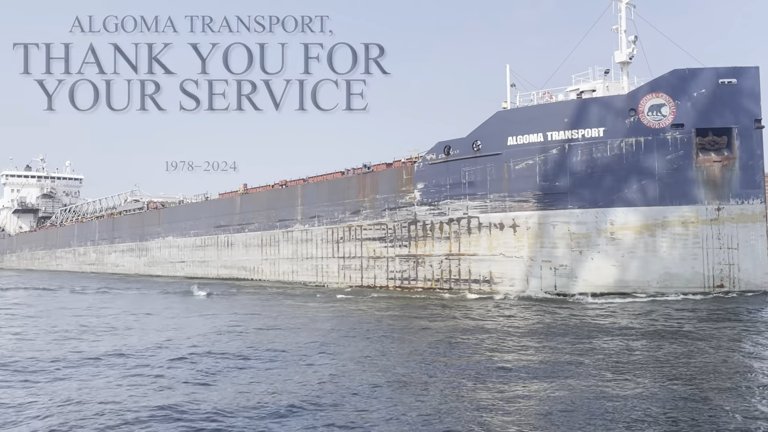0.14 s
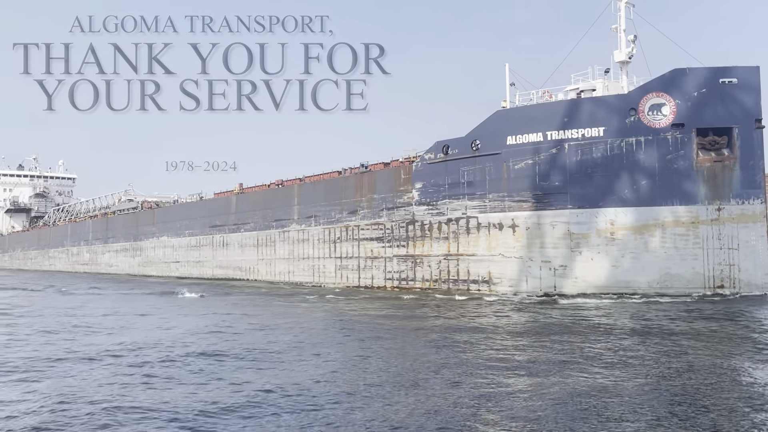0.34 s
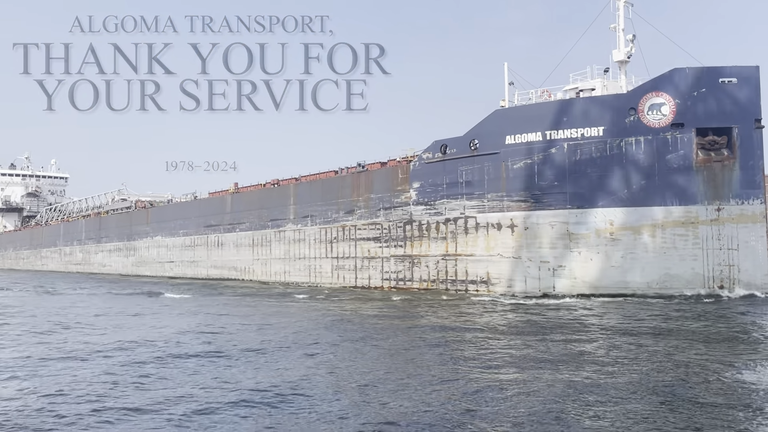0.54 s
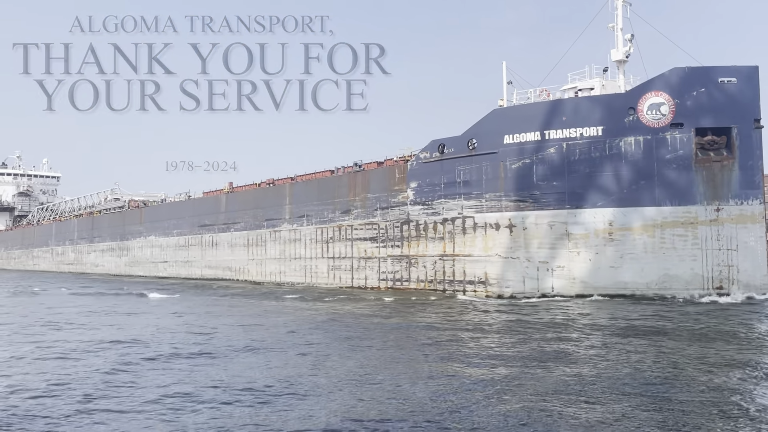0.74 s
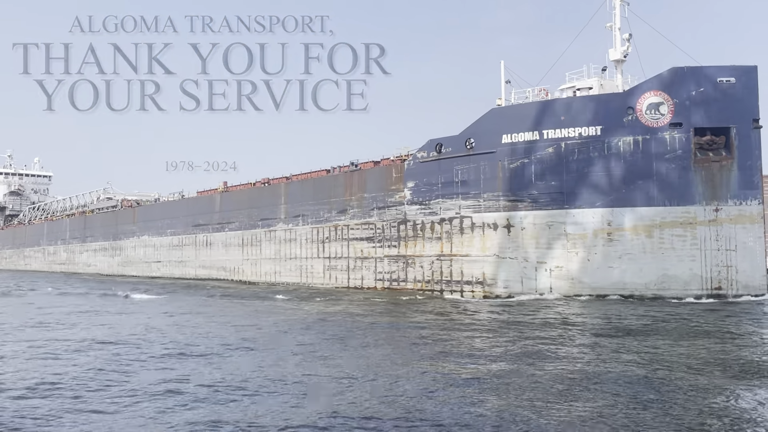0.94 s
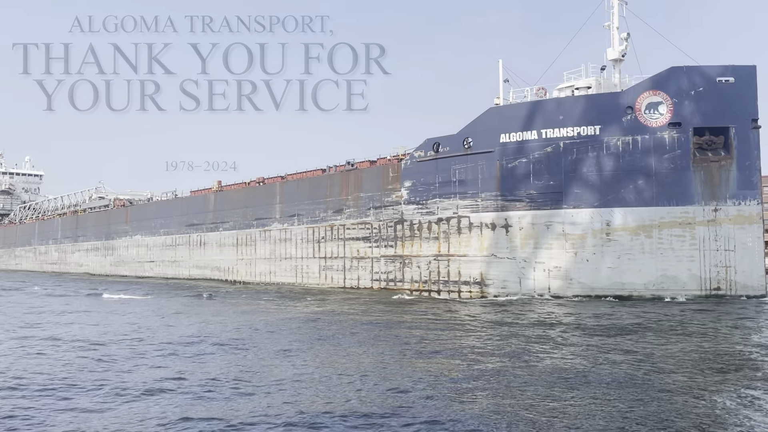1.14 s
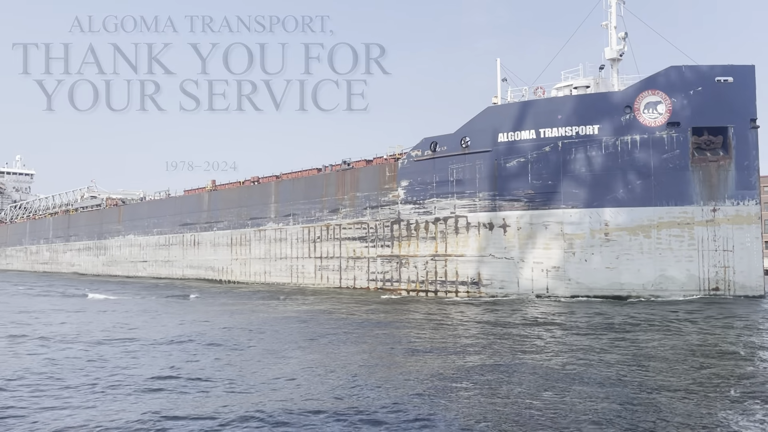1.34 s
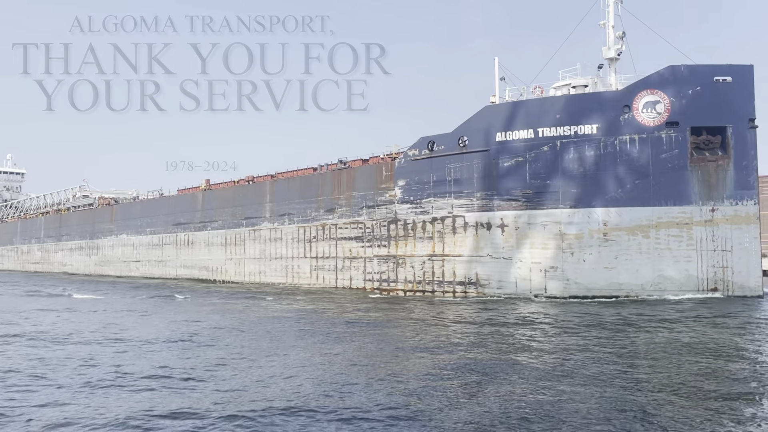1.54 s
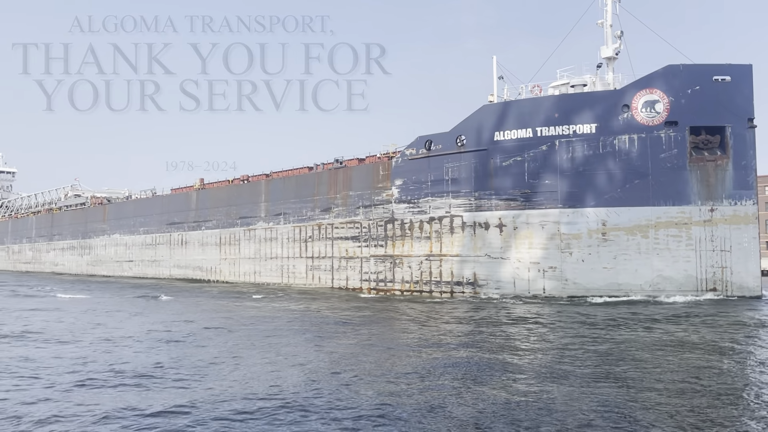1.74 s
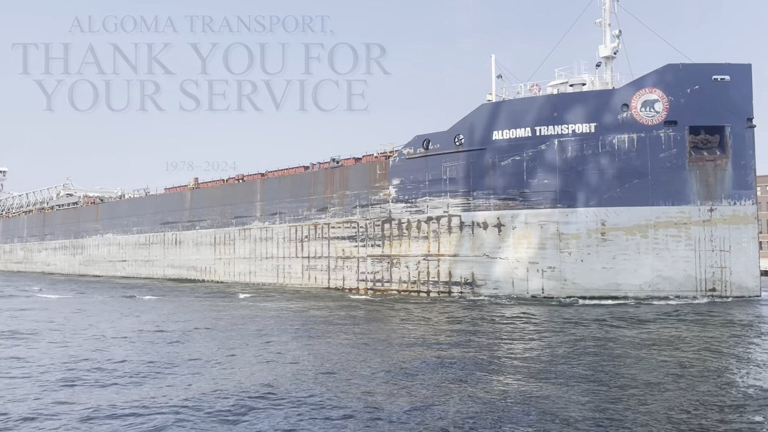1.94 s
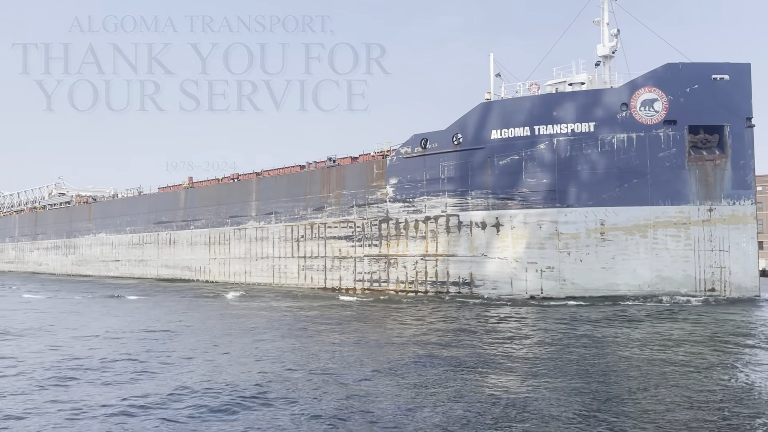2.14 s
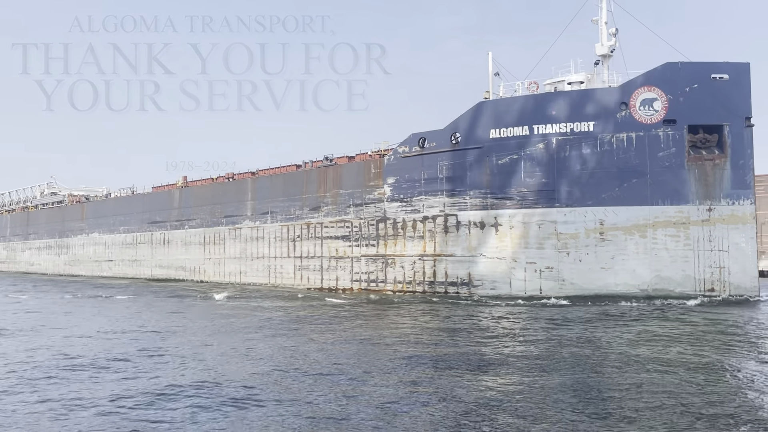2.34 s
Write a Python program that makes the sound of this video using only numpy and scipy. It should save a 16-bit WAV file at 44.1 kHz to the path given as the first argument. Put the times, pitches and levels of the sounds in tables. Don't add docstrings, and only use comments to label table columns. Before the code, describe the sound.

A ship's five-trumpet air horn dominates. At 0 s an earlier blast's echo is fading; a loud, brassy, clashing mid-pitched chord blares from about 0.2 to 0.6 s, then again from 0.95 to 1.4 s. Smeared echoes from quays follow each, wavering and dying away until about 2.5 s. Low engine rumble and soft water wash continue beneath, with small wind thumps near 0.2, 1.4 and 2.3 s.

```python
import sys
import numpy as np
from scipy import signal
from scipy.fft import rfft, irfft, next_fast_len
from scipy.io import wavfile
from scipy.ndimage import uniform_filter1d, map_coordinates

SR = 44100
rng = np.random.default_rng(int(sys.argv[2]) if len(sys.argv) > 2 else 0)


def amp(db):
    return 10 ** (np.asarray(db, float) / 20)


def write(x):
    x = np.atleast_2d(x).T
    wavfile.write(sys.argv[1], SR, np.round(np.clip(x, -1, 1) * 32767).astype(np.int16))


N = 110250
LEAD = 5 * SR // 4


def unit(x):
    return x / np.sqrt(np.mean(x ** 2) + 1e-20)


def along(points, hz):
    f, v = np.transpose(points)
    return np.interp(np.log(hz + 1), np.log(f + 1), v)


def wobble(rate, size):
    knots = rng.standard_normal(80)
    return map_coordinates(knots, [np.arange(size) * rate / SR], order=2)


def filtered(x, response):
    m = next_fast_len(x.shape[-1] + SR // 2)
    spectrum = rfft(x, m) * response(np.fft.rfftfreq(m, 1 / SR))
    return irfft(spectrum, m)[..., :x.shape[-1]]


def turned(x, points):
    return filtered(x, lambda hz: np.exp(np.array([[.5j], [-.5j]]) * along(points, hz)))


def pair(alike, size):
    def shares(hz):
        turn = np.arccos(np.clip(along(alike, hz), 0, 1)) / 2
        return np.array([np.cos(turn), np.sin(turn)])

    middle, side = np.sqrt(2) * filtered(rng.standard_normal((2, size)), shares)
    return np.array([middle + side, middle - side]) / np.sqrt(2)


def coloured(points, alike):
    return unit(filtered(pair(alike, N), lambda hz: amp(along([(8, -63)] + points, hz))))


# delay_s, level_db, left_minus_right_db, smear_s
ECHOES = [
    (0.088, -7.5, 1.5, 0.017),
    (0.172, -8, -3, 0.025),
    (0.269, -7.5, -1, 0.045),
    (0.398, -14.5, 1.5, 0.035),
    (.62, -22, 3, .05),
    (0.852, -20, -2.5, 0.069),
]
# pitch_hz, time_to_fall_60_db_s
RINGING = [(250, 2.11), (1000, 2.86), (4000, 1.8), (8000, .6)]
# pitch_hz, likeness_0_to_1
ECHO_ALIKE = [(200, .7), (500, 0.33), (1200, 0.23), (3000, 0.45), (7000, 0.75)]


def harbour(x):
    size = 2 * SR
    t = np.arange(size) / SR
    hz, tail_s, z = signal.stft(pair(ECHO_ALIKE, size), SR, nperseg=256)
    fade = amp(-60 * tail_s / along(RINGING, hz)[:, None])
    tail = signal.istft(z * fade, SR, nperseg=256)[1][:, :size]
    slaps = 0
    for delay_s, level_db, pan_db, smear_s in ECHOES:
        slap = np.exp(-.5 * ((t - delay_s) / smear_s) ** 2)
        sides_db = level_db + np.array([[pan_db], [-pan_db]]) / 2
        slaps = slaps + amp(sides_db) * slap / np.linalg.norm(slap)
    answer = amp(-11) * tail / np.linalg.norm(tail[0]) + slaps * pair(ECHO_ALIKE, size)
    dull = filtered(x, lambda f: 1 / (1 + (f / 5070) ** 4))
    return signal.fftconvolve(dull[None], answer, axes=1)[:, :len(x)]


# pitch_hz, level_db (per Hz)
RUMBLE = [(16, -43.5), (28, -10), (75, -1.5), (134, -13.5), (172, -17), (224, -17.5), (230, -13),
          (300, -37), (510, -120)]
# pitch_hz, likeness_0_to_1
LOW_ALIKE = [(40, 0.95), (200, 0.87)]


def engine_rumble():
    level_db = -44.5 + 2.8 * wobble(5.76, N)
    return coloured(RUMBLE + [(400, -63)], LOW_ALIKE) * amp(level_db)


# pitch_hz, level_db (per Hz)
WASH = [(150, -6.5), (400, -6), (1000, -1), (3000, -18), (6000, -27.5), (8500, -34.5), (10000, -46.5),
        (13000, -54)]
# pitch_hz, likeness_0_to_1
WASH_ALIKE = [(200, .7), (600, 0.11), (1500, .2), (3000, 0.75), (7000, 1)]


def water_wash():
    level_db = -47 + 0.96 * wobble(4, N)
    return coloured(WASH, WASH_ALIKE) * amp(level_db)


# start_s (of the peak), level_db, length_s
THUMPS = [
    (.03, -46, .03),
    (0.198, -38, 0.021),
    (1.293, -43.5, 0.023),
    (1.397, -38.5, 0.05),
    (1.473, -42, 0.028),
    (1.847, -46.5, 0.048),
    (2.291, -40.5, 0.035),
    (2.49, -42, 0.038),
]
# pitch_hz, level_db (per Hz)
THUMP_COLOUR = [(25, -19.5), (60, 1.5), (110, -3.5), (200, -12), (400, -25), (900, -64)]


def wind_thumps():
    t = np.arange(N) / SR
    gusts = sum(amp(level_db) * np.exp(-.5 * ((t - start_s) / length_s) ** 2)
                for start_s, level_db, length_s in THUMPS)
    return gusts * coloured(THUMP_COLOUR, LOW_ALIKE)


# start_s (valve opens), held_s, level_db, pitch_ratio, surge_share
BLASTS = [
    (-1.1, .4, -11, 1.001, .8),
    (.16, 0.379, -0.57, .999, 0.95),
    (.905, 0.46, -0.95, 1.002, 1.14),
]
# pitch_hz, level_db
BELL = [(1500, -46.5), (1850, -47), (2300, -48), (3500, -53), (5000, -59), (6800, -60), (8500, -73.5),
        (12500, -96)]


def trumpet(base_hz, late_s, rise_s, surge_db, low_db):
    release_s, sag, brighten = 0.084, 0.01252, 0.44
    scoop, scoop_s = 0.02994, 0.02967
    jitter, drift = 0.0019, 0.002492
    surge_s, surge_wide_s = 0.12, 0.033
    out = np.zeros(N + LEAD)
    t = np.arange(SR * 4 // 5) / SR
    k = np.arange(1, 49)[:, None]
    level_db = along(BELL, k * base_hz) + 1.5 * rng.standard_normal(k.shape)
    level_db[:5, 0] = low_db
    gain = np.sqrt(2) * amp(level_db)
    turn = rng.uniform(0, 2 * np.pi, k.shape)
    keep = k[:, 0] * base_hz < 12800
    for start_s, held_s, blast_db, ratio, share in BLASTS:
        opening = np.sin(np.pi / 2 * np.clip((t - late_s) / rise_s, 0, 1))
        pressure = opening * np.exp(-np.clip(t - held_s, 0, 9) / release_s)
        sharp = scoop * np.exp(-np.clip(t - late_s, 0, 9) / scoop_s)
        wander = jitter * wobble(25, len(t)) + drift * wobble(5.02, len(t))
        pitch_hz = base_hz * ratio * (1 - sag * (1 - pressure) + sharp + wander)
        on = pressure > 5e-3
        phase = (2 * np.pi * np.cumsum(pitch_hz[on]) / SR % (2 * np.pi)).astype(np.float32)
        slope = (1 + brighten * np.log(k[keep])).astype(np.float32)
        strength = np.exp(slope * np.log(pressure[on]).astype(np.float32))
        parts = strength * np.sin((k * phase + turn)[keep].astype(np.float32))
        surge = np.exp(-.5 * ((t[on] - surge_s) / surge_wide_s) ** 2)
        parts[0] *= amp(share * surge_db * surge)
        place = LEAD + round(start_s * SR) + np.flatnonzero(on)
        out[place] += amp(blast_db) * (gain[keep, 0].astype(np.float32) @ parts)
    return out


# pitch_hz, late_s, rise_s, opening_surge_db
TRUMPETS = [(258.75, .04, .24, -0.7), (297.5, .07, .12, -2.1), (304.83, .07, .13, 0.2),
            (360.03, .06, .2, -3.2), (366.13, .002, .12, 8.5)]
# first_db, second_db, third_db, fourth_db, fifth_db
PARTIALS = [(-21, -30, -30, -39, -40.5), (-28.5, -30, -29, -40, -45.5), (-24, -30, -37, -35.5, -46),
            (-32, -27, -35.5, -41, -39), (-26, -33.5, -40, -43.5, -43)]


def horn():
    chord = sum(trumpet(*row, low_db) for row, low_db in zip(TRUMPETS, PARTIALS))
    swell = np.sqrt(abs(uniform_filter1d(chord ** 2, size=900)))
    hiss = rng.standard_normal(len(chord))
    air = unit(filtered(hiss, lambda hz: amp(along(BELL, hz)) * (hz > 400)))
    mixed = chord + .07 * chord ** 2 + 0.75 * chord * chord * chord + amp(-18) * swell * air
    return filtered(mixed, lambda hz: hz ** 4 / (hz ** 4 + 189.0 ** 4))


# pitch_hz, left_leads_radians
BEARING = [(10, 2.2), (300, -0.2), (600, -0.8), (1200, -1.5), (2300, -1.27), (4000, -0.19)]


def direct_sound(chord):
    return turned(chord * amp([[-.3], [.3]]), BEARING)


def shimmer(x):
    z = signal.stft(x, nperseg=2048)[2]
    field = rng.standard_normal((3,) + z.shape[1:])
    field = uniform_filter1d(field, size=3, axis=1)
    field = uniform_filter1d(field, size=2, axis=2)
    waver_db = 2.5 * unit(field[0] + 0.64 * field[1:])
    return signal.istft(z * amp(waver_db), nperseg=2048)[1][:, :x.shape[1]]


def scene():
    chord = horn()
    across = (direct_sound(chord) + harbour(chord))[:, LEAD:]
    return shimmer(across) + engine_rumble() + water_wash() + wind_thumps()


# pitch_hz, left_leads_radians
PORTS = [(10, -0.03), (4500, -0.2), (6000, -1.53), (7900, -3.5), (8900, -2.5), (10000, -1.2), (13000, -0.7)]


def microphone_ports(x):
    return turned(x, PORTS)


def band_limit(x):
    return signal.sosfilt(signal.butter(12, 13110, fs=SR, output="sos"), x)


def record(dry):
    mix = microphone_ports(dry)
    return band_limit(mix)


dry = scene()
out = record(dry)
write(out)
```